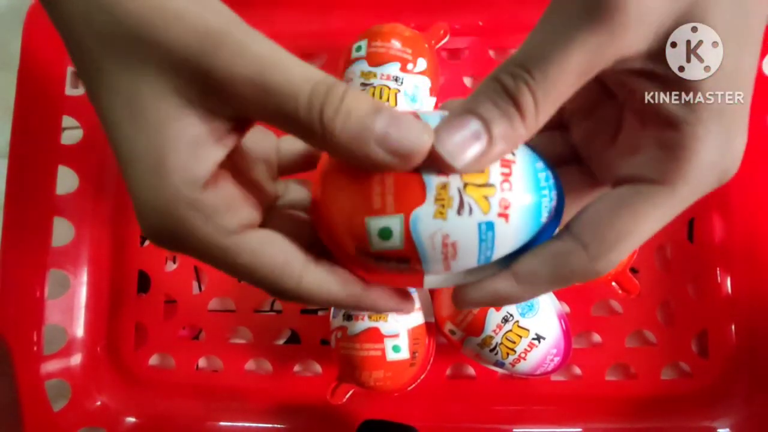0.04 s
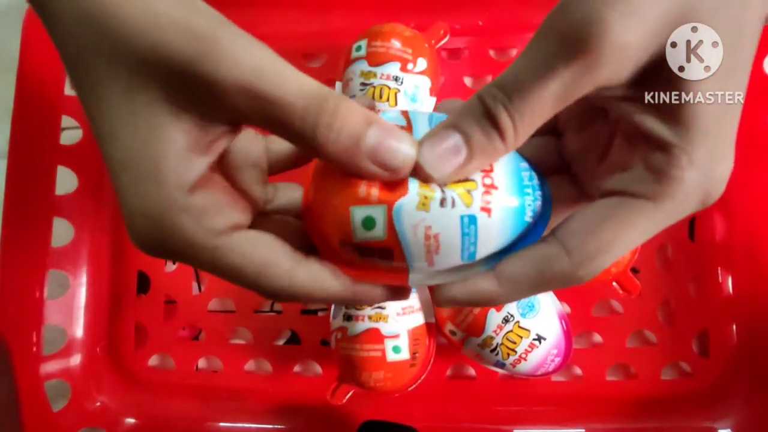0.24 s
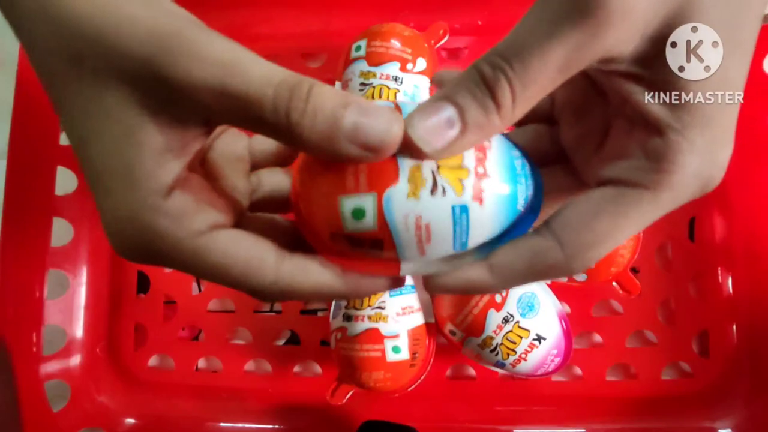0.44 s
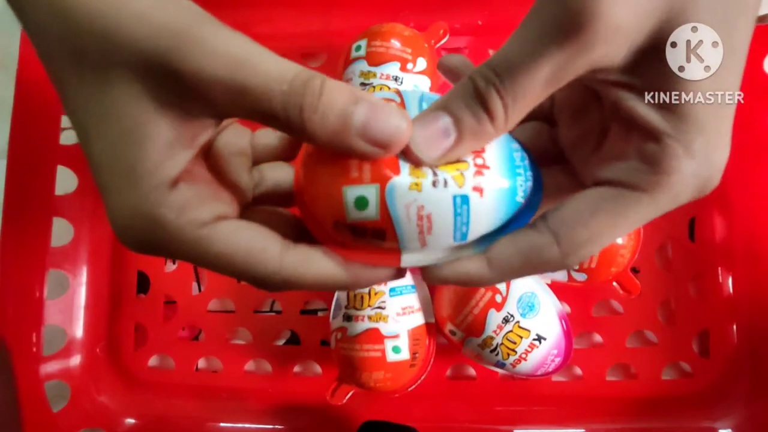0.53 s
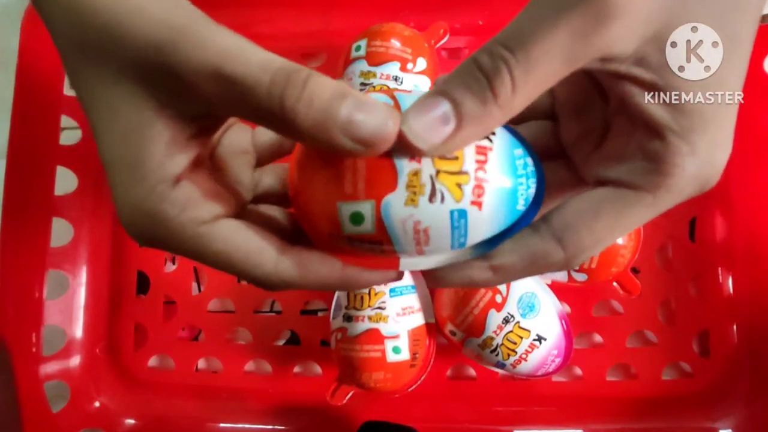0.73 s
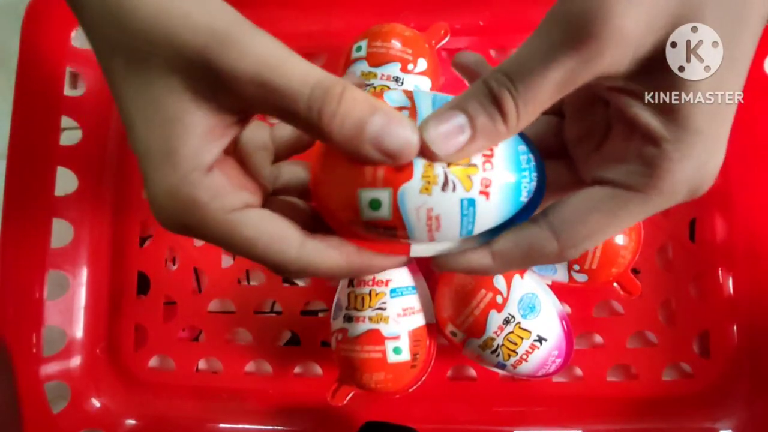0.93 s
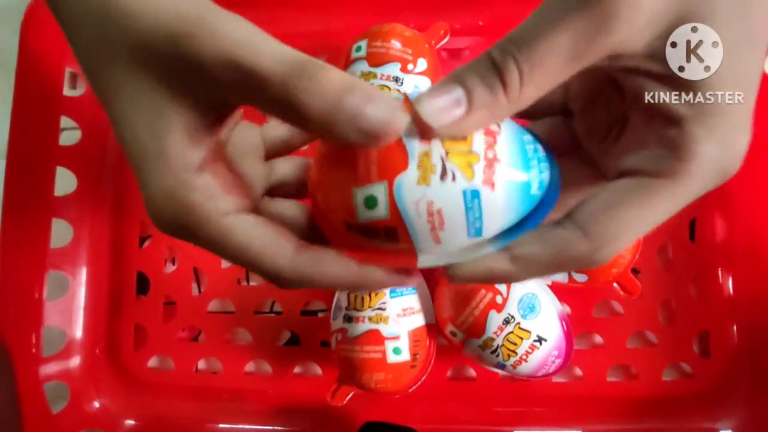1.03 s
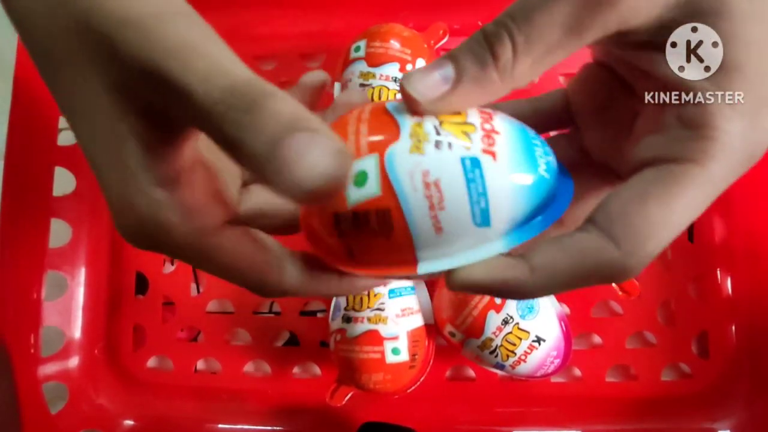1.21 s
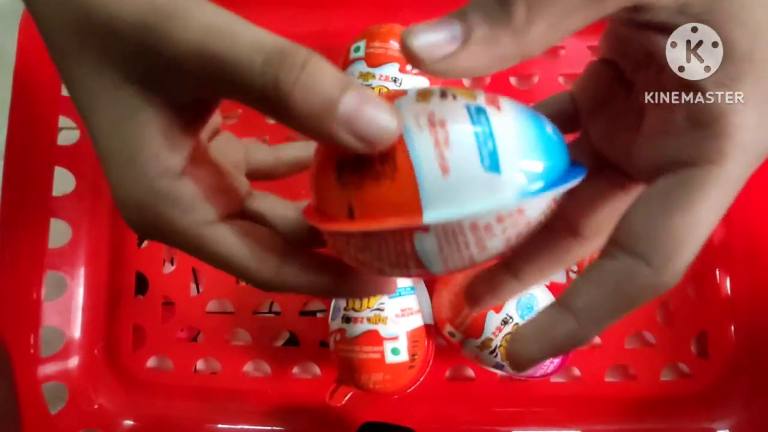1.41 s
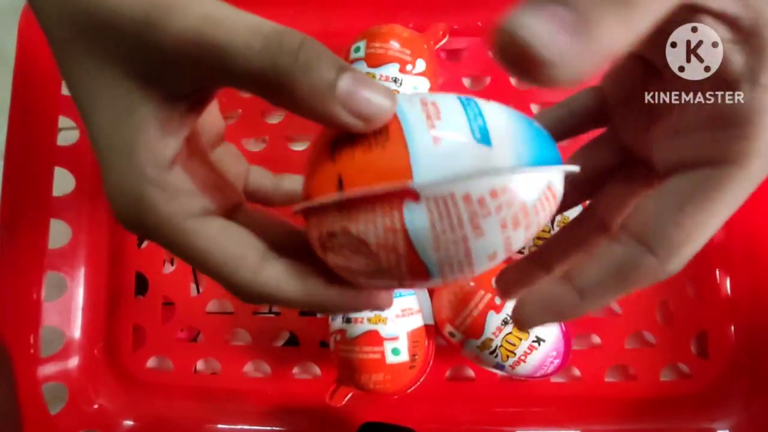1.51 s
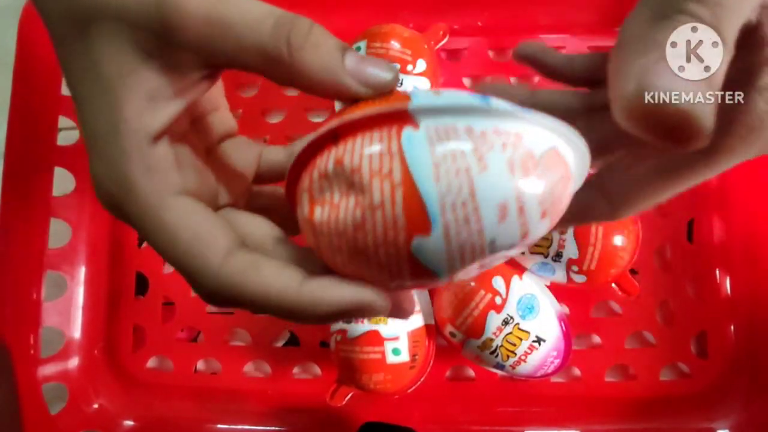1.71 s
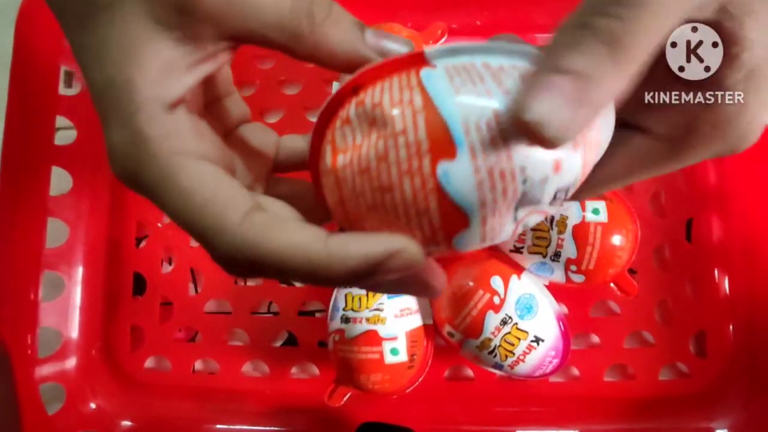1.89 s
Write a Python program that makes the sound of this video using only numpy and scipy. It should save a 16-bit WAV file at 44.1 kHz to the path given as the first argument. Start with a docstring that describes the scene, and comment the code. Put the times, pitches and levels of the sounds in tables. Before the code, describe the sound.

Plastic egg shell dents and snaps back in crisp paired clicks, handled close in a small room

```python
"""A thin plastic toy egg is handled close to the microphone in a small room; a low rumble lies underneath.
A faint high whistle, a decaying sine, opens; then fingers rub (gritty noise) and bump (damped modes) the egg.
Its rim ticks under the thumbnails, and the shell dents and springs back in snaps, mostly paired:
filtered pushes with crackle, ringing modes and a hollow knock. Faint ticks and rubs end the handling.
Every touch gets a short answer from the room, a decaying noise tail."""
import sys
import numpy as np
from scipy import signal
from scipy.fft import rfft, irfft, next_fast_len
from scipy.io import wavfile
from scipy.ndimage import map_coordinates

SR = 44100
rng = np.random.default_rng(int(sys.argv[2]) if len(sys.argv) > 2 else 0)


def master_out(mix):
    """Clip the mix to full scale and print it as 16-bit PCM to the path in sys.argv[1]."""
    frames = np.transpose(np.atleast_2d(mix))
    ceiling = np.clip(frames, -1, 1)
    pcm = np.round(ceiling * 32767).astype(np.int16)
    wavfile.write(sys.argv[1], SR, pcm)


N = 85995  # length in samples

# ringing modes of the plastic shell: f/Hz, level/dB, t60/s
SHELL_MODES = [(504, -3.5, 0.016), (1005, 0, 0.021), (1270, -13, 0.019), (1506, -2, 0.018),
               (3004, 2.5, 0.0081), (4190, 4.5, .012), (4970, -6.5, 0.0079), (5985, -1.5, 0.013),
               (8400, -9, 0.011)]
# modes of the hollow egg cupped in the hands: f/Hz, level/dB, t60/s
HOLLOW_MODES = [(87, -10, .035), (146, -2.5, 0.013), (209.5, 2.5, 0.027), (335, -1, 0.013),
                (417, -9.5, 0.016)]

CONTACT_S = 0.0005  # rise time of a click
LEVEL_WINDOW_S = 0.005  # a hit's level is its energy spread over this time


def snaps():
    """A patch of the shell pops through and rings at its own pitch; the shell rings too, the hollow knocks."""
    # dents and returns: t/s, level/dB, treble tilt/dB per octave, upper edge f/Hz,
    # dent f/Hz, dent ring over push level/dB, hollow knock level/dB
    snap_events = [(0.4176, -26.5, 0.5, 5200, 2210, 0.5, -33.5),
                   (0.4446, -23.5, -0.5, 10000, 2216, -1.5, -35), (0.747, -30.5, 0, 5750, 2270, 0.5, -36),
                   (0.7753, -25, -0.7, 6740, 1480, -3, -29), (0.9365, -35.5, -5, 7000, 2060, -5.5, -38.5),
                   (1.1068, -27, -0.5, 4300, 2170, -0.5, -35.5), (1.1272, -21, 1, 8800, 2230, -3, -36)]
    # spectrum of the push on the shell: f/Hz, level/dB
    push_colour = [(100, -10), (350, 1.5), (1000, -1), (2300, 3.5), (4200, -1), (6000, -10.5),
                   (7200, -14.5), (10000, -16.5), (13000, -27), (16000, -36)]
    low_hz = 111  # the small shell radiates little below this
    shell_ring_db = -4  # the whole shell's ring against the push
    dent_t60_s = 0.018
    room_dent_db = -4.5  # the dent's ring as sent to the room, against the snap level
    knock_tilt_db = 6.5  # per octave: a snap drives the hollow harder than a finger

    out = np.zeros(N)
    for s, db, tilt_db, top_hz, dent_hz, dent_db, knock_db in snap_events:
        near, spread = pushes(push_colour, tilt_db)
        dent = amp(dent_db) * ring([(dent_hz, 0, dent_t60_s)], 0)
        knock = amp(knock_db) * ring(HOLLOW_MODES, knock_tilt_db)
        shell = amp(shell_ring_db) * ring(SHELL_MODES, tilt_db)
        close = amp(db) * shaped(near + dent + shell, top_hz, low_hz)
        add(out, s, close + knock)
        to_room = amp(db) * shaped(spread, top_hz, low_hz) + knock
        add(out, s, room(to_room) + room(amp(db + room_dent_db) * dent))
    return out


def ticks():
    """Small clicks of the stiff rim: each a push with crackle that sets the rim's modes ringing."""
    # nails and rim: t/s, level/dB, treble tilt/dB per octave, lower edge f/Hz
    tick_events = [(0.258, -44, -5, 600), (0.283, -32.5, 0.5, 550), (.3208, -49, -4, 1200),
                   (0.3779, -39.5, -5.5, 2500), (0.3878, -48, -4.5, 2800), (0.3971, -46.5, -3.5, 1500),
                   (0.4019, -34.5, 1.5, 1480), (0.4111, -42.5, -0.5, 790), (0.6281, -40.5, -1, 400),
                   (.7530, -50, -2, 900), (.7640, -36.5, -5, 3830), (0.774, -46, -4, 2480),
                   (1.0122, -39.5, 0, 700), (1.091, -45.5, -3.5, 1000), (1.1011, -37.5, -2.5, 3540),
                   (1.1487, -44.5, -1, 1000), (1.3963, -61.5, -9.5, 3000), (1.446, -59.5, -14, 3460),
                   (1.53, -59, -6.5, 990), (1.9154, -62.5, 7, 1000)]
    # ringing modes of the rim: f/Hz, level/dB, t60/s
    rim_modes = [(1760, 9.5, 0.012), (2195, 6, .014), (3176, 8, .014), (3780, 4.5, .016), (4100, 6, 0.013),
                 (5260, 7, .014), (5820, 4, .014), (6510, -10, 0.042), (7990, -3.5, 0.018),
                 (9730, -12, 0.014)]
    # spectrum of the push on the rim: f/Hz, level/dB
    push_colour = [(100, -22), (400, -2), (1500, -3.5), (4000, 2), (6000, -4.5), (8500, -6.5),
                   (11000, -14.5), (16000, -44)]
    rim_ring_db = -1  # the rim's ring against the push
    top_hz = 12500  # upper edge of a tick

    out = np.zeros(N)
    for s, db, tilt_db, low_hz in tick_events:
        near, spread = pushes(push_colour, tilt_db)
        rim = amp(rim_ring_db) * ring(rim_modes, tilt_db)
        add(out, s, amp(db) * shaped(near + rim, top_hz, low_hz))
        add(out, s, room(amp(db) * shaped(spread, top_hz, low_hz)))
    return out


def bumps():
    """A soft finger sounds the hollow and rings the shell less strongly."""
    # finger bumps: t/s, level/dB, shell ring over hollow level/dB
    bump_events = [(0.224, -40, -15), (.2450, -33.5, -11.5), (.5860, -40, -18), (0.615, -36.5, -7.5),
                   (0.965, -32.5, -27)]
    shell_tilt_db = -6.5  # per octave: the shell's ring is dull under a soft finger

    out = np.zeros(N)
    for s, db, clack_db in bump_events:
        clack = amp(clack_db) * ring(SHELL_MODES, shell_tilt_db)
        add(out, s, amp(db) * (ring(HOLLOW_MODES, 0) + clack))
    return out


def rubs():
    """Short gritty strokes of skin and nail on plastic: noise made uneven by stick and slip."""
    # strokes: t/s, length/s, level/dB, treble tilt/dB per octave
    rub_events = [(.098, 0.0096, -63, 5), (0.1078, 0.0171, -47.5, -1.5), (0.125, .013, -46.5, -0.5),
                  (0.237, 0.054, -56, -6), (0.6, 0.032, -57, -3.5), (0.961, 0.033, -60, -5),
                  (1.379, 0.024, -68, -5), (1.43, 0.039, -58, -5.5), (1.465, .05, -58, -7.5),
                  (1.554, 0.037, -70, -2), (1.776, 0.083, -71, -5.5)]
    # spectrum of the grit: f/Hz, level/dB
    grit_colour = [(300, -17.5), (1500, -5.5), (3300, -8), (4200, 4.5), (5200, -3), (6200, -3.5),
                   (8000, -7.5), (12000, -22.5), (16000, -41)]
    slips_per_s, slip_db = 690, 4.5  # rate and depth of the stick and slip

    out = np.zeros(N)
    for s, length, db, tilt_db in rub_events:
        size = int(length * SR)
        slip = amp(slip_db * wobble(slips_per_s, SR // 2))
        grit = unit(noise(grit_colour, SR // 2, tilt_db) * slip)[:size]
        add(out, s, amp(db) * grit * signal.windows.tukey(size, .5))
    return out


def room(x):
    """The walls' answer builds up quickly; each frequency dies at its own speed."""
    # decay of the room: f/Hz, t60/s
    decay_times = [(150, 0.41), (500, 0.41), (1500, 0.35), (3000, 0.35), (6000, 0.27), (12000, 0.17)]
    # spectrum of the room's answer: f/Hz, level/dB
    tail_colour = [(150, 2.5), (500, -2.5), (1200, 7.5), (2200, 0.5), (4000, -7), (7000, -0.5),
                   (14000, -7.5)]
    room_db, build_s = -14.5, 0.007  # level of the answer, time of its build-up

    hz, t, z = signal.stft(noise(tail_colour, SR // 2), SR, nperseg=256)
    decay = amp(-60 * t / along(decay_times, hz)[:, None])
    tail = signal.istft(z * decay, SR, nperseg=256)[1]
    tail_t = np.arange(len(tail)) / SR
    tail = tail * (1 - np.exp(-(tail_t / build_s) ** 2))
    return amp(room_db) * signal.fftconvolve(x, tail / np.linalg.norm(tail))[:N]


def whistle():
    """A faint high sine that swells and fades away exponentially."""
    peak_s, hz, peak_db = 0.018, 3400, -67.5  # level is rms
    rise_db_per_s, fall_db_per_s = 300, 97
    t = np.arange(N) / SR - peak_s
    fade_db = np.minimum(rise_db_per_s * t, -fall_db_per_s * t)
    return amp(peak_db + fade_db) * np.sqrt(2) * np.sin(2 * np.pi * hz * t)


def background():
    """The steady rumble of the surroundings: coloured noise."""
    # spectrum of the rumble: f/Hz, level/dB
    rumble_colour = [(8, -48), (20, -9), (32, -1), (55, -10.5), (96, -20), (125, -9), (160, -14.5),
                     (245, -6.5), (400, -10.5), (740, -22.5), (900, -20.5), (2100, -35.5), (2700, -37.5),
                     (4800, -46.5), (8000, -50), (16000, -52.5)]
    rumble_db = -49  # rms
    return amp(rumble_db) * noise(rumble_colour, N)


def pushes(colour, tilt_db):
    """One sudden push: with its crackle as heard close up, and smooth as the sum of all directions."""
    splinter_db, splinter_t60_s = 6.5, 0.012  # the crackle of the wall: level over the push, decay
    t = np.arange(SR // 10) / SR
    pulse = unit_hit(1. * (np.arange(len(t)) == round(CONTACT_S * SR)))
    crackle = rng.standard_normal(len(t)) * amp(-60 * t / splinter_t60_s)
    splinter = unit_hit(crackle * (1 - np.exp(-t / CONTACT_S)))

    def gain(hz):
        """Spectrum of the push with its tilt."""
        return amp(along(colour, hz)) * tilted(hz, tilt_db)

    near = unit_hit(causal(pulse + amp(splinter_db) * splinter, gain))
    spread = unit_hit(causal(pulse, gain))
    return near, spread


def ring(modes, tilt_db):
    """Damped modes after one contact, of alternating sign and slightly random strength."""
    scatter_db = 2.5  # change of each mode from click to click
    t = np.arange(SR // 10) / SR
    x = np.zeros(len(t))
    for k, (hz, db, t60) in enumerate(modes):
        level_db = db + scatter_db * rng.standard_normal()
        strength = (-1) ** k * tilted(hz, tilt_db)
        x += strength * amp(level_db - 60 * t / t60) * np.sin(2 * np.pi * hz * t)
    return unit_hit(x * (1 - np.exp(-t / CONTACT_S)))


def shaped(x, top_hz, low_hz):
    """x in the band that a contact allows, at unit level."""
    def gain(hz):
        """Slopes of 18 dB per octave beyond both edges."""
        return 1 / np.sqrt((1 + (hz / top_hz) ** 6) * (1 + (low_hz / (hz + 1)) ** 6))

    return unit_hit(causal(x, gain))


def causal(x, gain):
    """x through the causal minimum-phase filter with the given gain over frequency."""
    size = 2 * len(x)
    log_gain = np.log(np.maximum(gain(np.fft.rfftfreq(size, 1 / SR)), 1e-6))
    cepstrum = irfft(log_gain, size)
    # folding the cepstrum forward leaves no response before the hit
    cepstrum[1:size // 2] *= 2
    cepstrum[size // 2 + 1:] = 0
    return irfft(rfft(x, size) * np.exp(rfft(cepstrum)), size)[:len(x)]


def noise(colour, size, tilt_db=0):
    """Coloured noise of rms 1."""
    hz = np.fft.rfftfreq(size, 1 / SR)
    spectrum = rfft(rng.standard_normal(size))
    return unit(irfft(spectrum * amp(along(colour, hz)) * tilted(hz, tilt_db), size))


def wobble(rate, size):
    """A smooth random curve, rate knots a second."""
    knots = rng.standard_normal(size)
    return map_coordinates(knots, [np.arange(size) * rate / SR])


def tilted(hz, tilt_db):
    """Gain of a slope in dB per octave, 1 at 1 kHz and flat below 100 Hz."""
    return amp(tilt_db * np.log2(np.maximum(hz, 100) / 1000))


def along(points, hz):
    """Values at hz between (f/Hz, value) points on a log frequency axis."""
    f, v = np.transpose(points)
    return np.interp(np.log(hz + 1), np.log(f + 1), v)


def amp(db):
    """Decibels to gain."""
    return 10 ** (np.asarray(db) / 20)


def unit(x):
    """x at rms 1."""
    return x / np.sqrt(np.mean(x ** 2) + 1e-20)


def unit_hit(x):
    """x with the energy of rms 1 over the level window."""
    return x / np.sqrt(np.sum(x ** 2) / (LEVEL_WINDOW_S * SR) + 1e-20)


def add(track, s, x):
    """Mix x into track from time s."""
    part = track[round(s * SR):][:len(x)]
    part += x[:len(part)]


def scene():
    """The egg close to the microphone, its room, the whistle and the background."""
    fingers = bumps() + rubs()
    egg = snaps() + ticks() + fingers + room(fingers)  # snaps and ticks bring their own room
    return (egg + whistle() + background())[None]


def record(dry):
    """The recorder keeps nothing above its band limit."""
    top_hz = 16100
    m = next_fast_len(N + SR // 2)
    kept = np.fft.rfftfreq(m, 1 / SR) < top_hz
    return irfft(rfft(dry, m) * kept, m)[..., :N]


dry = scene()
out = record(dry)
master_out(out)
```